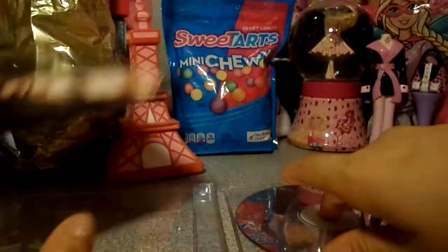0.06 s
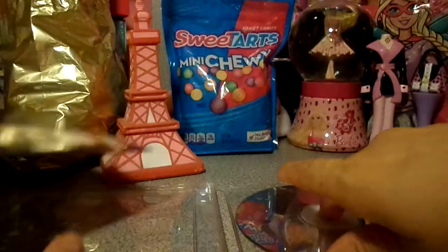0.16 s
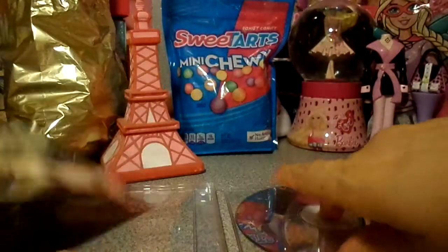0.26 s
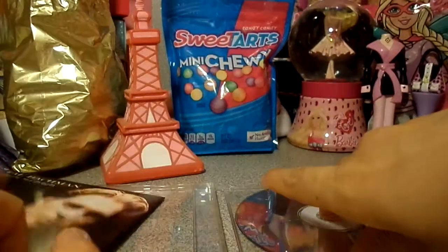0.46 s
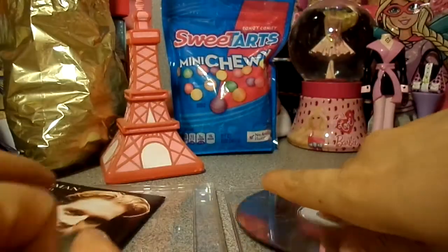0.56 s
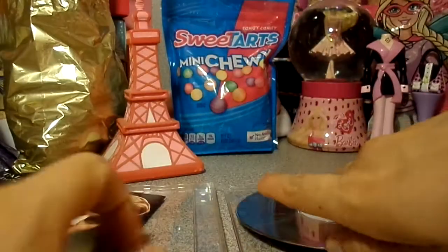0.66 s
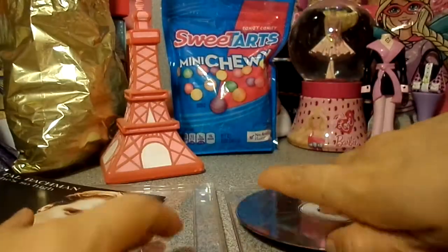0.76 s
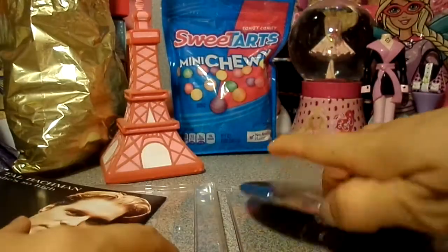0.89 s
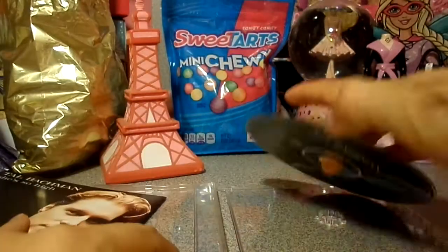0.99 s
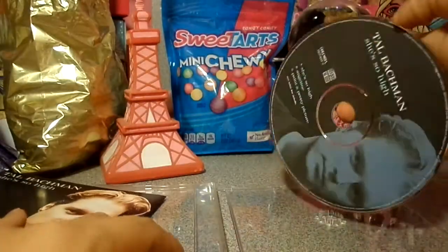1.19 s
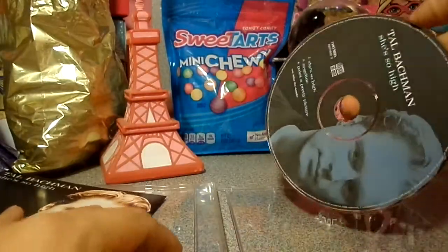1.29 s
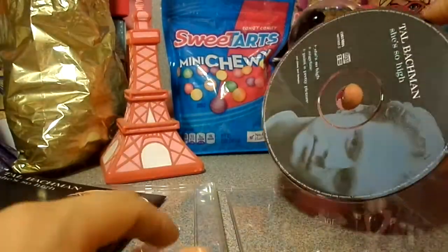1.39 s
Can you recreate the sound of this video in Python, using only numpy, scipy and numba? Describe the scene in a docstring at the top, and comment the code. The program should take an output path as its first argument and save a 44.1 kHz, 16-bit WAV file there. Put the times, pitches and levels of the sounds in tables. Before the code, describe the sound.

A plastic disc case ticks and knocks sharply on a table as paper rustles lightly. The disc snaps off its hub and slides out faintly, followed by soft hand bumps. Heard close in a small, humming room.

```python
"""In a small room with a fan-like hum, a paper booklet is laid on an open plastic disc case on a table,
and the disc is pressed off its hub and lifted. Impacts excite the damped modes of the shell and hub:
the case knocks, the hub teeth tick and snap, loose plastic rattles. Stick-slip friction makes paper,
fingers and disc rustle and plastic squeak, and hands bump the table softly.
An automatic gain control ducks at the loudest knock and creeps back."""
import sys
import numpy as np
from scipy import signal
from scipy.fft import rfft, irfft, next_fast_len
from scipy.io import wavfile
from scipy.ndimage import uniform_filter1d
from numba import njit

SR = 44100
rng = np.random.default_rng(int(sys.argv[2]) if len(sys.argv) > 2 else 0)


def transcribe(u):
    """Save the signal u as a 16-bit wav file named by the first command-line argument.

    u: samples, shape (n,) or (channels, n), limited to [-1, 1]; the rate is SR.
    q: integer samples, one column per channel.
    """
    v = np.clip(np.atleast_2d(u).T, -1, 1)
    q = np.round(v * 32767).astype(np.int16)
    wavfile.write(sys.argv[1], SR, q)


N = 63945

# spectral envelopes of air noise, rubbing, sliding and impacts (f/Hz, relative level/dB)
AIR_SPECTRUM = [(20, -19), (45, -1.5), (90, -4.5), (250, -5.5), (400, -8), (520, -13.5), (720, -4),
                (950, -11), (1200, -17.5), (2200, -21.5), (4000, -28.5), (8000, -35), (15500, -39)]
RUB_SPECTRUM = [(300, -2), (900, 3.5), (1800, 5), (4000, -2.5), (8000, -2.5), (15000, -3.5)]
SLIDE_SPECTRUM = [(400, -0.5), (1100, -4), (1700, -3.5), (2800, -7), (5700, -8.5), (10000, -10),
                  (15000, -14.5)]
SHELL_SPECTRUM = [(200, -40.5), (540, -23), (720, -3.5), (1200, -6), (3300, -3.5), (4200, -3.5),
                  (4800, -10.5), (6000, -5.5), (7900, 0), (9600, -18), (12500, -11), (15500, -13.5)]
HUB_SPECTRUM = [(200, -22), (900, -6.5), (1200, -4), (3800, 0.5), (5000, -0.5), (8000, -2), (11000, -4.5),
                (13000, 1), (14800, -3.5), (16000, 1)]
# resonances of the hum (f/Hz, nominal bandwidth/Hz, rms level/dB)
HUM_RESONANCES = [(55.3, 7.1, -52.5), (135.9, 15.4, -47), (210.8, 18, -49.5), (779, 68, -53),
                  (2457, 75, -57.5)]
# hands bumping the table (t/s, f/Hz, relative level/dB)
TABLE_BUMPS = [(0.089, 138.4, -23), (1, 129, -26), (1.077, 206.5, -24), (1.151, 55, -23.5), (1.27, 58, -35)]
# swells of noise (t/s, attack/s, decay time constant/s, level/dB)
PAPER_RUBS = [(.113, 0.0047, 0.027, -42), (.206, 0.0047, 0.028, -45.5), (.255, 0.015, 0.11, -47.5),
              (.432, 0.0029, 0.0035, -34), (.555, 0.017, 0.014, -41)]  # paper and fingers
DISC_SLIDES = [(.775, 0.022, 0.029, -41.5), (.832, 0.019, .012, -49.5), (.975, 0.0068, 0.044, -55.5)]  # the disc leaving the tray
SHELL_RATTLES = [(.366, 0.003, 0.036, -30)]  # after the big knock
HUB_RATTLES = [(.5, 0.0036, 0.02, -26)]  # after the big snap
# plastic sticking and slipping (t/s, duration/s, first f/Hz, last f/Hz, level/dB)
PLASTIC_SQUEAKS = [(0.375, 0.036, 3050, 3470, -37), (0.4083, .0075, 3070, 2400, -28.5),
                   (.617, .012, 4700, 4400, -48), (0.797, 0.0278, 1880, 1570, -44),
                   (0.838, 0.027, 5400, 5730, -49.5)]
# normal modes (f/Hz, relative level/dB, T60/s before a contact's ring length factor)
SHELL_MODES = [(732, -4, .055), (1088, -1, .045), (1572, 1, .05), (1760, -4, .05), (2033, -3, .04),
               (2301, -4, .04), (2562, 0, .045), (2805, -2, .04), (3185, 5, .045), (3597, 2, .045),
               (3885, -3, .055), (5347, -3, .04), (6466, -2, .04), (7585, 3, .032), (8020, -3, .035),
               (12700, -4, .04)]
HUB_MODES = [(1150, 0, .045), (1580, 0, .055), (1773, 0, .05), (2094, -2, .045), (3225, -2, .055),
             (4000, 1, .045), (4751, -4, .04), (5380, 0, .04), (7400, -2, .04), (7862, -1, .04),
             (9986, 2, .035), (12700, 1, .04), (13035, 1, .04), (13950, 3, .04)]  # with the disc
# contacts (t/s, relative level/dB, tilt/(dB/octave), ring length factor,
# f/Hz favoured by the struck spot, its lift/dB)
SHELL_KNOCKS = [(.2072, -28.5, -8, 0.71, 1710, 7), (.3497, -2.5, -1.06, 0.76, 3240, 1),
                (.3535, -10.5, 1, 0.41, 3300, 5), (.3675, -22.5, -4, 1.1, 3900, 11),
                (.4328, -27.5, 2.5, 0.75, 6550, 7), (.4605, -16, 0, 0.74, 1710, 9),
                (.5125, -27.5, -8.5, 1.1, 1640, -4), (.6205, -41, 6, 0.65, 4550, 0),
                (.813, -32, -9, .9, 1700, 2)]
HUB_SNAPS = [(.2071, -20, 2.6, 0.32, 13900, 7.5), (.238, -26, 1.5, 0.83, 6300, 7.4),
             (.3045, -25, 2.3, 1.2, 7000, 3), (.411, -20, 1, .4, 14500, 2.3),
             (.477, -12.5, 2.6, 1.3, 8250, 8.3), (.487, -20, 1, .8, 7700, 4),
             (.4904, 5, 0.88, .75, 1100, 2.7), (.5085, -12, 1.1, 0.35, 9600, 5),
             (.578, -23.5, 0.95, 0.68, 7060, 7.4)]

TIME = np.arange(N) / SR


def undb(db):
    """Amplitude ratio of a level in decibels."""
    return 10 ** (np.asarray(db) / 20)


def unit(x):
    """Normalisation to unit energy."""
    return x / np.sqrt(np.sum(x ** 2) + 1e-18)


def at_rms(x, db):
    """Normalisation to an rms level."""
    return unit(x) * np.sqrt(len(x)) * undb(db)


def decay(t60, age=TIME):
    """Exponential damping: 60 dB in t60 seconds."""
    return np.exp(-np.log(1000) * age / t60)


def wander(seconds):
    """A moving average of white noise: random drift of unit rms."""
    return at_rms(uniform_filter1d(rng.standard_normal(N), max(int(seconds * SR), 2)), 0)


def swell(rows):
    """Superposed envelopes, each a linear rise and an exponential fall."""
    return sum(undb(db) * np.clip((TIME - start) / rise, 0, 1)
               * np.exp(-np.maximum(TIME - start - rise, 0) / fall) for start, rise, fall, db in rows)


def colour(x, spectrum, tilt_db=0):
    """Minimum-phase filtering by a spectral envelope, tilted by tilt_db per octave."""
    size = next_fast_len(2 * N)
    octave = np.log2(np.fft.rfftfreq(size, 1 / SR) + 1)
    hz, db = np.array(spectrum).T
    gain_db = np.interp(octave, np.log2(hz), db) + tilt_db * np.maximum(octave, np.log2(hz[0]))
    cepstrum = irfft(np.log(undb(gain_db)), size)
    cepstrum[1:size // 2] *= 2  # folding onto positive time makes the filter causal
    cepstrum[size // 2 + 1:] = 0
    return irfft(rfft(x, size) * np.exp(rfft(cepstrum)), size)[:N]


def air_and_hum():
    """Narrow resonances driven by noise hum above broadband air noise."""
    out = at_rms(colour(rng.standard_normal(N), AIR_SPECTRUM), db=-42.5)
    for hz, width, db in HUM_RESONANCES:
        b, a = signal.iirpeak(hz, hz / (1.42 * width), fs=SR)
        band = signal.filtfilt(b, a, rng.standard_normal(2 * N))
        out += at_rms(band[N // 2:N // 2 + N], db)
    return out


def reverberation(x, t60=.26, delay_s=.007, db=-15):
    """The room's diffuse field: convolution with decaying noise, duller at the top."""
    tail = rng.standard_normal(N) * decay(t60) * (TIME > delay_s)
    tail = colour(tail, [(300, 4.2), (3000, 4), (8000, 3.1), (15000, 1.7)])
    return undb(db) * signal.fftconvolve(x, unit(tail))[:N]


def table_bumps(rise_s=.03, t60=.16):
    """Each soft push builds up a faint, low damped oscillation of the table."""
    out = np.zeros(N)
    for start, hz, db in TABLE_BUMPS:
        age = np.maximum(TIME - start, 0)
        envelope = (1 - np.exp(-age / rise_s)) * decay(t60, age)
        out += undb(db) * envelope * np.sin(2 * np.pi * hz * age)
    return out


def friction(strokes, spectrum, grains_per_s=5400, spread_db=2.5):
    """Stick-slip friction: dense random impulses merge into a rustle that swells with each stroke."""
    slips = (rng.random(N) < grains_per_s / SR) * rng.choice([-1, 1], N)
    grains = slips * undb(spread_db * rng.standard_normal(N))
    return swell(strokes) * at_rms(colour(grains, spectrum), 0)


def squeaks(jitter=.025):
    """Nearly periodic stick-slip of plastic on plastic gives short, unsteady gliding tones."""
    out = np.zeros(N)
    for start, duration, first_hz, last_hz, db in PLASTIC_SQUEAKS:
        progress = np.clip((TIME - start) / duration, 0, 1)
        hz = (first_hz + (last_hz - first_hz) * progress) * (1 + jitter * wander(seconds=.0004))
        out += undb(db) * np.sin(np.pi * progress) * np.sin(2 * np.pi * np.cumsum(hz) / SR)
    return out


def rattle(swells, spectrum, rebounds_per_s=600, spread_db=2.5):
    """Loose plastic rebounds as a Poisson process, each contact a dry burst of noise."""
    rebounds = (rng.random(N) < rebounds_per_s / SR) * undb(spread_db * rng.standard_normal(N))
    cracks = signal.fftconvolve(rebounds, decay(t60=.01))[:N] * rng.standard_normal(N)
    return swell(swells) * at_rms(colour(cracks, spectrum), 0)


def noise_burst(t60):
    """Densely overlapping modes ring like damped noise."""
    return rng.choice([-1., 1.], N) * decay(t60)


def contact_crack(t60):
    """A brief contact is broadband: a burst whitened to a flat spectrum."""
    spectrum = rfft(noise_burst(t60))
    return irfft(spectrum / (np.abs(spectrum) + 1e-9), N) * (np.arange(N) < N // 2)


def impacts(contacts, modes, spectrum, crack_t60, dense_t60, dense_db, modes_db):
    """Impact excitation: a crack, a dense short ring and modes that waver as loose parts chatter."""
    wander_hz, spot_ratio = 35, 2 ** .18
    partials = []
    for hz, db, t60 in modes:
        cycles = rng.random() + np.cumsum(hz + wander_hz * wander(seconds=.002)) / SR
        partials.append((undb(db) * np.sin(2 * np.pi * cycles), t60))
    out = np.zeros(N)
    for start, db, tilt_db, length, spot_hz, lift_db in contacts:
        crack = unit(colour(contact_crack(crack_t60 * length), spectrum))
        dense = unit(colour(noise_burst(dense_t60 * length), spectrum))
        ring = sum(wave * decay(t60 * length) for wave, t60 in partials)
        ring = unit(ring * (1 - decay(crack_t60)))  # the modes build up as the crack dies
        spot = [(spectrum[0][0], 0), (spot_hz / spot_ratio, 0),
                (spot_hz, lift_db), (spot_hz * spot_ratio, 0)]
        hit = colour(crack + undb(dense_db) * dense + undb(modes_db) * ring, spot, tilt_db)
        onset = int(start * SR)
        out[onset:] += undb(db) * unit(hit)[:N - onset]
    return out


def shell_knocks():
    """Free vibration of the case shell after each sharp blow."""
    return undb(16) * impacts(SHELL_KNOCKS, SHELL_MODES, SHELL_SPECTRUM,
                              crack_t60=.0038, dense_t60=.097, dense_db=-3, modes_db=-.5)


def hub_snaps():
    """Free vibration of hub and disc after each tick or snap of the teeth."""
    return undb(11.5) * impacts(HUB_SNAPS, HUB_MODES, HUB_SPECTRUM,
                                crack_t60=.028, dense_t60=.047, dense_db=1, modes_db=-3.5)


def scene():
    """Superposition of the handling sounds, their reverberation, the table bumps and the hum."""
    handling = shell_knocks() + hub_snaps()
    handling += rattle(SHELL_RATTLES, SHELL_SPECTRUM) + rattle(HUB_RATTLES, HUB_SPECTRUM)
    handling += squeaks() + friction(PAPER_RUBS, RUB_SPECTRUM) + friction(DISC_SLIDES, SLIDE_SPECTRUM)
    return (handling + reverberation(handling) + table_bumps() + air_and_hum())[None]


@njit
def follow(x, attack_s, release_s):
    """Envelope detection: first-order smoothing with separate times for rise and fall."""
    out, envelope = np.empty(len(x)), 0.
    for i in range(len(x)):
        envelope += (x[i] - envelope) / (SR * (attack_s if x[i] > envelope else release_s))
        out[i] = envelope
    return out


def record(dry, threshold_db=-21, ratio=2.38, glide_s=.008, cutoff_hz=15800):
    """Dynamic range compression with a gliding gain, then clipping and a steep low-pass."""
    envelope = follow(np.abs(dry[0]), attack_s=.0037, release_s=.48)
    excess = np.maximum(envelope / undb(threshold_db), 1)
    gain = uniform_filter1d(excess ** (1 / ratio - 1), int(glide_s * SR))
    low_pass = signal.ellip(10, .2, 80, cutoff_hz, fs=SR, output="sos")
    return signal.sosfilt(low_pass, np.clip(dry * gain, -.8, .8))


dry = scene()
out = record(dry)
transcribe(out)
```